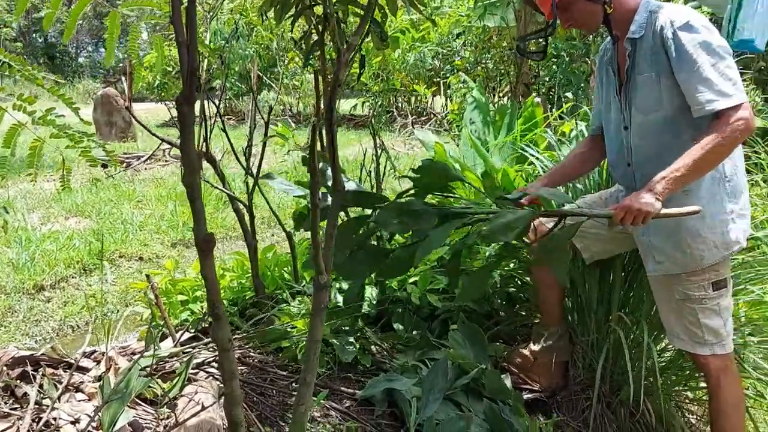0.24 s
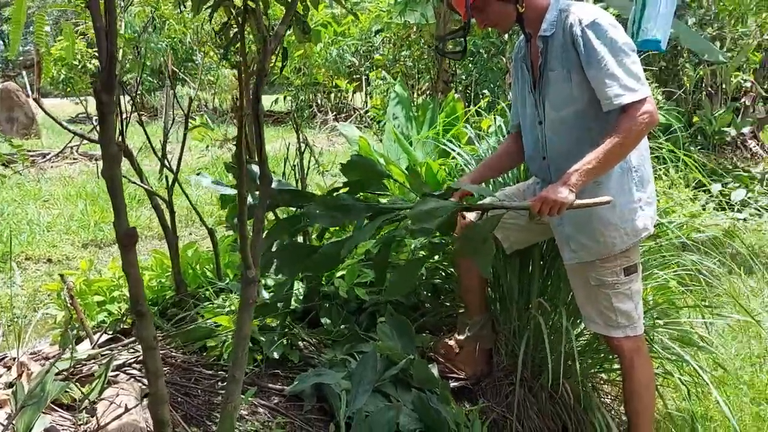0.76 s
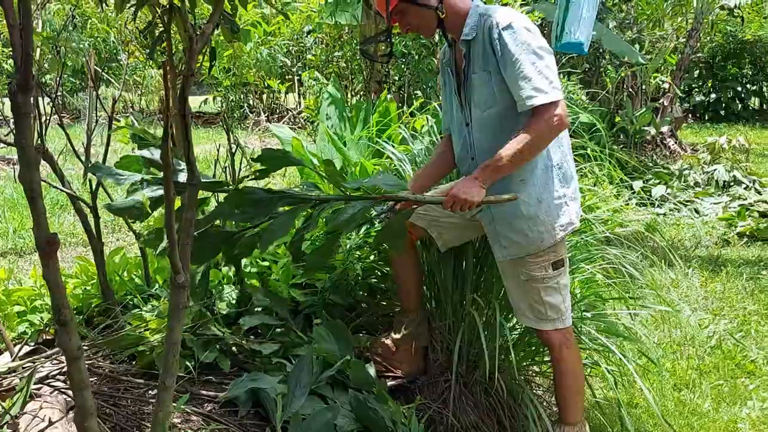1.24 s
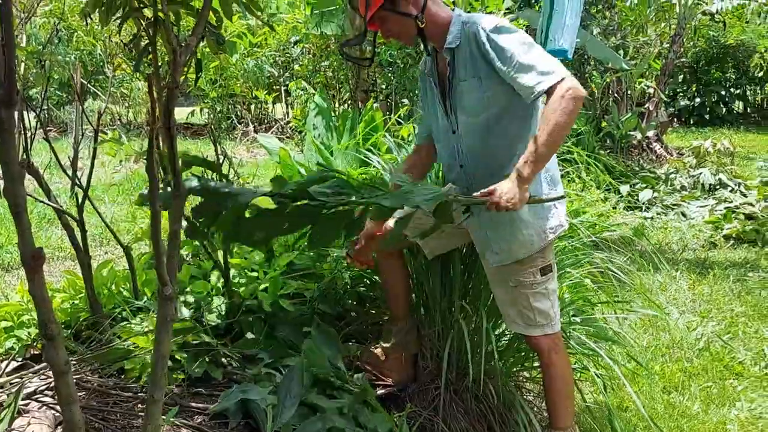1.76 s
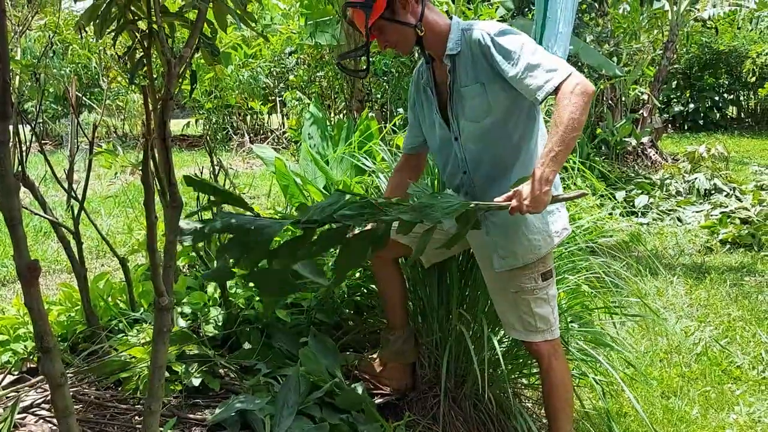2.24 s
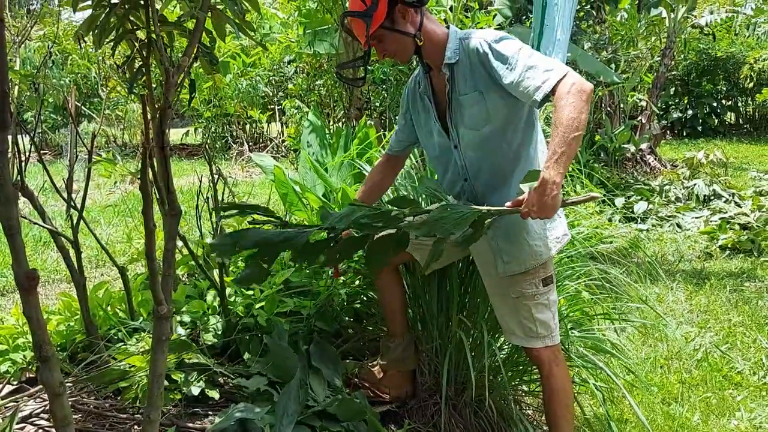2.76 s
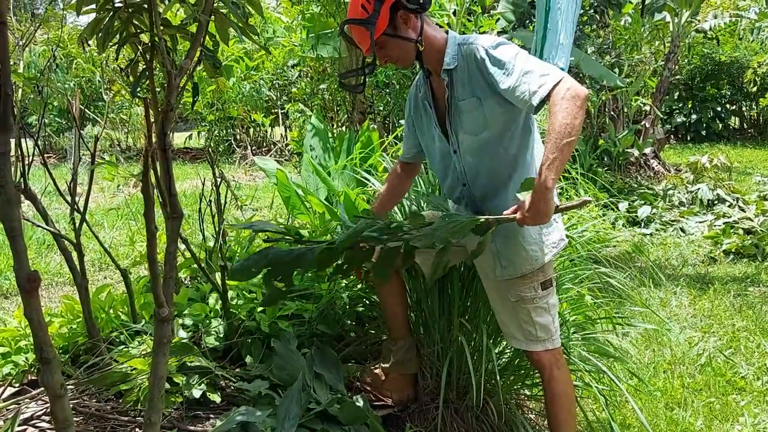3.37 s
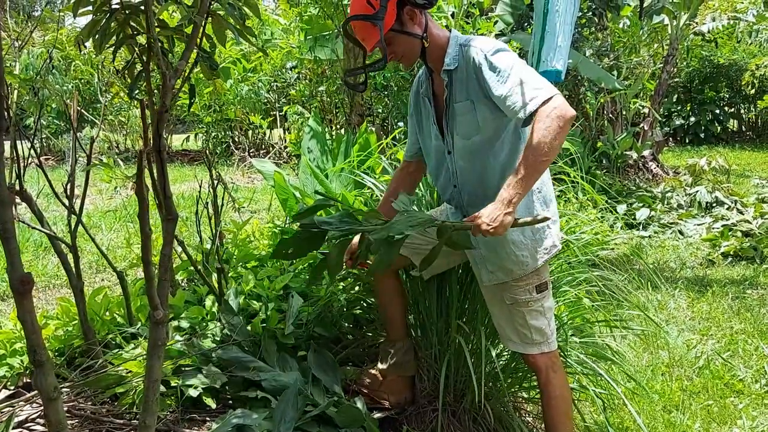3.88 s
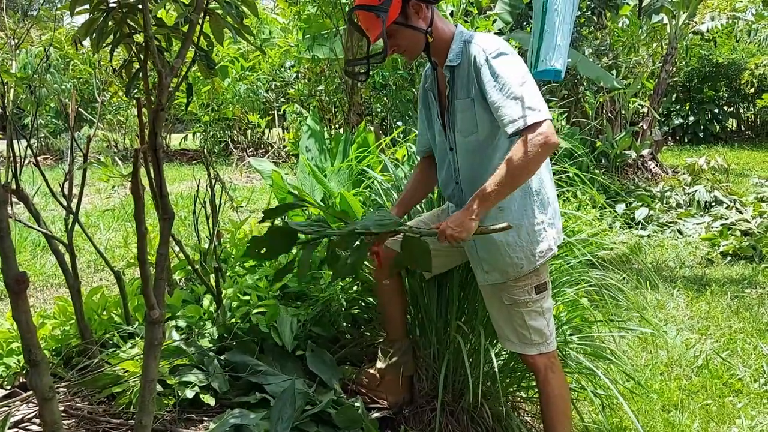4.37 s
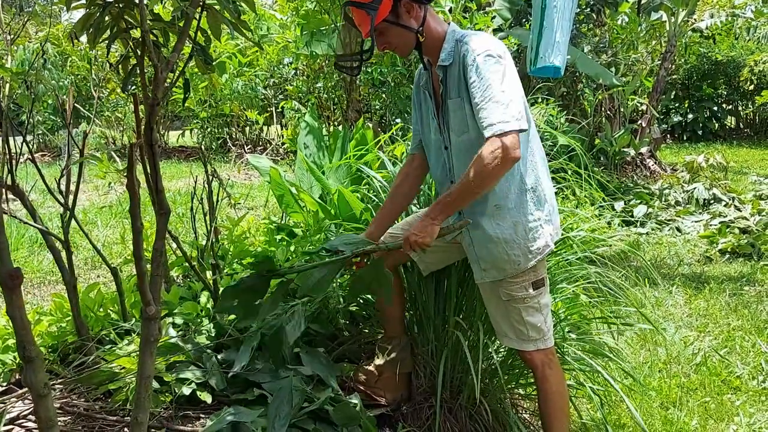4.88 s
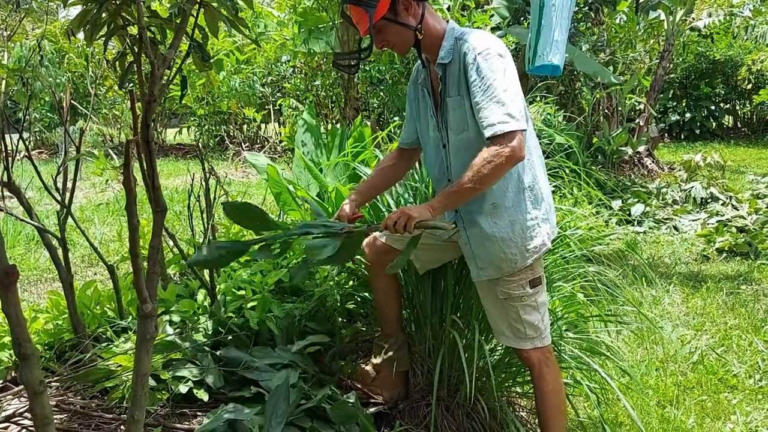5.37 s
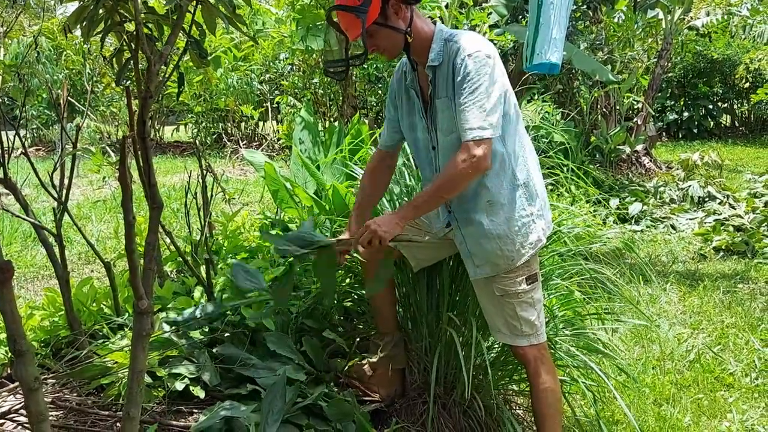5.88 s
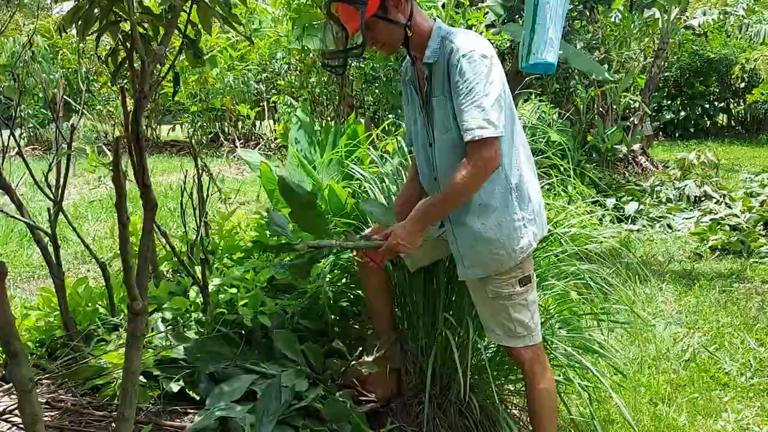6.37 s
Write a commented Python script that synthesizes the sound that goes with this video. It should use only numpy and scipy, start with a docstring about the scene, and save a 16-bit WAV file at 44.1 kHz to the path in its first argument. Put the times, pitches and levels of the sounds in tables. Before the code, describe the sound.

A continuous bright insect hiss, with a faintly pulsing buzz and thin whine, surrounds someone pruning a branch outdoors. Crunchy stem snips stand out, mild at first, then louder and crisper, with a double cut midway and a final bright snap followed by a hollow knock. Soft leaf crackles, ticks and faint thuds fill the gaps. Heard in stereo from a few metres, with little echo.

```python
"""In a garden, hand pruning shears snip side shoots off a leafy branch a few metres away.
Each cut is shaped noise: fibres crunch, the stem snaps and tears; sine waves ring for the steel blades.
Leaves rustle as crackling noise and tiny ticks; stems knock and thud as short, quickly fading noise.
All round, insects hiss as bands of noise, one with a thin whine in it, over a very faint stir of air."""
import sys
import numpy as np
from scipy import signal
from scipy.fft import rfft, irfft, next_fast_len
from scipy.io import wavfile
from scipy.ndimage import uniform_filter1d

SR = 44100
rng = np.random.default_rng(int(sys.argv[2]) if len(sys.argv) > 2 else 0)


def digitize_waveform(pressure):
    """Quantize a signal to 16-bit integers and store it at the path in sys.argv[1].

    Rows of a 2-D input are taken as channels; values are limited to [-1, 1].
    """
    field = np.atleast_2d(pressure).T
    bounded = np.clip(field, -1, 1)
    quanta = np.round(bounded * 32767).astype(np.int16)
    wavfile.write(sys.argv[1], SR, quanta)


N = 292383
T = np.arange(N) / SR  # time of every sample, s


def amp(db):
    """Turn decibels into a gain."""
    return 10 ** (np.asarray(db) / 20)


def unit(x):
    """Scale to an average strength (rms) of 1."""
    return x / np.sqrt(np.mean(x ** 2))


def pan(db):
    """Left and right gains whose levels differ by db; positive leans left."""
    return amp(np.array([[db], [-db]]) / 2)


def above(f, hz):
    """Smooth step from 0 below a frequency to 1 above it."""
    return 1 / (1 + (hz / f) ** 4)


def hump(f, hz, octaves):
    """Bell shape of a resonance, 1 at its centre."""
    return 1 / (1 + (np.log2(f / hz) / octaves) ** 2)


def colour(x, spectrum, extra_db=lambda f: 0):
    """Filter by a table of (frequency [Hz], level [dB]) plus an extra curve in dB; rms 1."""
    length = x.shape[-1]
    n = next_fast_len(length, True)
    f = np.fft.rfftfreq(n, 1 / SR) + 1
    hz, db = np.transpose(spectrum)
    curve_db = np.interp(np.log(f), np.log(hz), db) + extra_db(f)
    filtered = irfft(rfft(x, n) * amp(curve_db), n)
    return unit(filtered[..., :length])


def pair(length, alike_hz, grain_db=0):
    """Stereo noise, more alike in both ears below alike_hz; grain_db makes its strength uneven."""
    n = next_fast_len(length, True)
    size = 16  # samples in one grain
    grains = np.repeat(amp(grain_db * rng.exponential(size=n // size + 1)), size)[:n]
    noise = rng.standard_normal((2, n)) * np.minimum(grains, 6)
    mid, side = rfft(noise)
    likeness = 1 - above(np.fft.rfftfreq(n, 1 / SR) + 1, alike_hz)
    mid = mid * np.sqrt(1 + likeness)
    side = side * np.sqrt(1 - 0.85 * likeness)
    return irfft(np.array([mid + side, mid - side]), n)[:, :length]


def walk(rate):
    """Smoothly wandering random level, with about rate new values a second; rms 1."""
    hold = int(SR / rate)
    steps = np.repeat(rng.standard_normal(N // hold + 1), hold)
    smooth = uniform_filter1d(uniform_filter1d(steps, hold), hold)
    return unit(smooth[:N])


def swell(t, rise, decay):
    """Exponential growth up to time 0, then exponential decay (both in s)."""
    return np.exp(np.minimum(t / rise, -t / decay))


def event_time(size=16384):
    """Time axis in s, with 0 at the middle of a short event."""
    return (np.arange(size) - size // 2) / SR


def add(out, s, x):
    """Mix in a sound whose middle falls at time s."""
    start = int(s * SR) - x.shape[1] // 2
    first, last = max(start, 0), min(start + x.shape[1], N)
    out[:, first:last] += x[:, first - start:last - start]


# Tone of the faint stir of air: (frequency [Hz], level [dB])
AIR_TONE = [(20, -31.5), (45, -6.5), (75, 4.5), (130, 2), (300, -8), (700, -17), (1500, -29), (3000, -19),
            (15000, -21.5)]


def stir_of_air():
    """Air moves as very faint, mostly low noise whose level wanders a little."""
    return colour(pair(N, 1200), AIR_TONE) * amp(-79.5 + 0.91 * walk(5.6))


BUZZ_DB, HISS_DB, SHRILL_DB = -57.5, -52.1, -44.5  # middle levels of the three choirs
BUZZ_DRIFT_DB, HISS_DRIFT_DB, SHRILL_DRIFT_DB = 1.04, -0.14, 0.56  # each choir drifts by itself
DRIFT_PER_S = 3
HISS_FADE_DB_PER_S, SHRILL_RISE_DB_PER_S = 0.37, 0.17  # the hiss sinks as the shrill choir builds
PULSE_HZ, WHINE_HZ = 113, 2267  # beat of the sound organs, and the note of the nearest insect
# Tone of the narrow, pulsing choir: (frequency [Hz], level [dB])
BUZZ_TONE = [(1700, -45.5), (1920, -17.5), (2080, -3), (2250, 4), (2400, -4.5), (2540, -14.5),
             (2700, -65.5)]
# Tone of the broad, hissing choir: (frequency [Hz], level [dB])
HISS_TONE = [(2700, -54.5), (3050, -22), (3500, -6.5), (4000, 2), (5100, -2), (5800, 1.5), (6500, 1.5),
             (7400, -4), (9000, -10), (12000, -12), (13500, -8.5), (15700, -42.5)]
# Tone of the shrill choir in the left ear: (frequency [Hz], level [dB])
SHRILL_LEFT_TONE = [(7000, -39), (8000, -34.5), (8600, -6.5), (9200, 2.5), (9900, -1.5), (10700, -12),
                    (11600, -17.5), (13000, -32)]
# Tone of the shrill choir in the right ear: (frequency [Hz], level [dB])
SHRILL_RIGHT_TONE = [(7000, -37), (7900, -5.5), (8450, 0.5), (9050, 5), (9700, -10), (10500, -3.5),
                     (11400, -23), (13000, -31.5)]


def insects():
    """Many small sound organs blur into noise: a pulsing buzz with a whine, a hiss and a shrill band."""
    from_middle = T - T.mean()
    buzz_db = BUZZ_DB + BUZZ_DRIFT_DB * walk(DRIFT_PER_S)
    hiss_db = HISS_DB + HISS_DRIFT_DB * walk(DRIFT_PER_S) - HISS_FADE_DB_PER_S * from_middle
    shrill_db = SHRILL_DB + SHRILL_DRIFT_DB * walk(DRIFT_PER_S) + SHRILL_RISE_DB_PER_S * from_middle

    # beat and whine waver slightly in speed and pitch
    beat = np.cos(2 * np.pi * np.cumsum(PULSE_HZ + 0.12 * walk(3)) / SR)
    whine = np.sin(2 * np.pi * np.cumsum(WHINE_HZ + 3 * walk(25)) / SR)
    whine = whine * amp(-6 + 2 * walk(7))

    buzz = (colour(pair(N, 1560), BUZZ_TONE) + whine) * (1 + 0.18 * beat)
    buzz = buzz * amp(buzz_db + 0.44 * walk(15)) * pan(2.6)
    hiss = colour(pair(N, 1300), HISS_TONE) * amp(hiss_db + 0.28 * walk(10)) * pan(-2.2)
    left = colour(rng.standard_normal(N), SHRILL_LEFT_TONE) * amp(3.0 + 0.5 * walk(6.5))
    right = colour(rng.standard_normal(N), SHRILL_RIGHT_TONE) * amp(-1.0 + 0.5 * walk(8.2))
    shrill = np.array([left, right]) * (1 + 0.055 * beat) * amp(shrill_db)
    return buzz + hiss + shrill


# every cut shakes the leaves: delay, level relative to the cut, growth and dying away
SHAKE_LAG_S, SHAKE_DB, SHAKE_RISE_S, SHAKE_DECAY_S = 0.028, -33.5, 0.025, 0.06
LEAF_REST_DB = -85.5  # the leaves never lie quite still
# Pulls on the leafy branch: (time [s], strength of leaf motion [dB], rise [s], decay [s])
BRANCH_PULLS = [(.07, -63, 0.046, 0.06), (.21, -63.5, 0.062, 0.092), (1.265, -56, 0.045, 0.095),
                (1.73, -54.5, 0.051, 0.078), (1.99, -58, .03, 0.06), (2.44, -51.5, 0.039, 0.057),
                (2.59, -56.5, 0.074, 0.03), (3.46, -68.5, 0.11, 0.075), (3.93, -49.5, 0.098, 0.044),
                (4.3, -69, 0.063, 0.085), (4.85, -64, 0.11, 0.32), (5.23, -59, 0.031, 0.065),
                (5.33, -58, 0.037, 0.053), (6.02, -53, .04, 0.087), (6.41, -63.5, 0.053, 0.037)]
# Cuts of the shears, which also shake the leaves; crack, crunch and scatter are relative to the tearing:
# (time [s], tearing level [dB], tearing decay [s], first crack [dB], crunch [dB], foliage scatter [dB],
#  woody lows [dB], bright top [dB], blade ring strength [dB], stem resonance [Hz],
#  resonance strength [dB], left minus right [dB])
SHEAR_CUTS = [(0.8244, -29.5, 0.0052, -0.5, -9.5, -13.5, -3.5, -5.5, -23, 5900, 3.3, -0.5),
              (1.459, -21.5, 0.0042, 4.5, -9.5, -13.5, -11, -3.5, -4.5, 3400, 9.2, 0),
              (2.188, -24, 0.0033, -12, -14.5, -11, 1.5, 0.5, -16, 3500, 7, 0),
              (3.6759, -27.5, 0.0074, 3, -7.5, -8, -11, 3, -5, 4760, 13, -1),
              (3.6975, -19, 0.0056, 3, -11, -10, 10, 0, -6, 5370, 5.2, -1),
              (4.6205, -33, 0.012, -12, -32, -16, 5, -7, -24, 1980, 2.7, 2),
              (4.6322, -17, 0.0065, -6, -15, -15, 7, 6, -10.5, 6220, 7.1, 1),
              (5.4719, -33.5, 0.0066, -1, -17, -11.5, -7.5, 0.5, -7, 1500, 15.3, 0.5),
              (5.8413, -17.5, 0.0044, -3.5, -8.5, -12, 0.5, 5.5, -7, 5800, 6.5, 0)]


def leaf_motion():
    """Each pull on the branch swells and dies away; each cut shakes the leaves by its own strength."""
    power = amp(LEAF_REST_DB) ** 2
    for s, db, rise, decay in BRANCH_PULLS:
        power = power + (amp(db) * swell(T - s, rise, decay)) ** 2
    for s, db, *_ in SHEAR_CUTS:
        shake = swell(T - s - SHAKE_LAG_S, SHAKE_RISE_S, SHAKE_DECAY_S)
        power = power + (amp(db + SHAKE_DB) * shake) ** 2
    return np.sqrt(power)


TICKS_PER_S, TICK_DECAY_S, TICK_DB, TICK_HZ = 45, 0.0031, -5, 1560  # flicking leaf stalks
# Tone of leaves, for ticks and crackles: (frequency [Hz], level [dB])
LEAF_TONE = [(60, -11.5), (140, -5), (300, -6), (600, -3), (1000, -6), (1550, 1), (2700, -2), (5000, -3.5),
             (12000, -10.5), (15800, -18)]


def leaf_ticks():
    """Stalks catch and let go at random, each with a short dry tick of its own size; rms 1."""
    sizes = amp(4.6 * np.clip(rng.standard_normal(N), -2, 2))
    flicks = (rng.random(N) < TICKS_PER_S / SR) * sizes
    fading = signal.lfilter([1], [1, -np.exp(-1 / (TICK_DECAY_S * SR))], flicks)
    return colour(pair(N, 2500) * fading, LEAF_TONE, lambda f: 7 * hump(f, TICK_HZ, 0.44))


# Leaves brushing lightly past each other: (time [s], level [dB], swell time [s])
LEAF_BRUSHES = [(.2, -53, 0.099), (1.1, -53, .15), (1.78, -51, 0.16), (2.43, -50, .05), (2.68, -50, 0.11),
                (3.5, -49, .06), (4.3, -54.5, .07), (5.1, -53, .09)]
# Light, bright tone of brushing leaf faces: (frequency [Hz], level [dB])
BRUSH_TONE = [(2500, -26), (4500, 0.5), (7500, 4.5), (11500, 5.5), (13500, -8.5), (15800, -9)]


def rustle():
    """Leaves slide over each other in fits of tiny crackles, with a light sheen where faces brush."""
    # different leaves take turns, so low, middle and upper crackles flicker separately
    crackle = 0
    for hz in (300, 800, 1600):
        leaf = colour(pair(N, 2150, grain_db=2.0), LEAF_TONE, lambda f: 10 * hump(f, hz, 0.49))
        crackle = crackle + leaf * amp(-8.5 + 4.0 * walk(80))
    moving = (crackle + amp(TICK_DB) * leaf_ticks()) * leaf_motion()
    brushing = sum(amp(db) * swell(T - s, width, width) for s, db, width in LEAF_BRUSHES)
    return moving + colour(pair(N, 1500), BRUSH_TONE) * brushing


# Stems and leaves knocking, levels before a shared 2 dB lift:
# (time [s], level [dB], rise [s], decay [s], treble [dB], hollow resonance [Hz])
STEM_KNOCKS = [(0.175, -60.5, .006, 0.019, 6, 333), (0.275, -58.5, 0.0037, 0.007, 8, 1440),
               (0.781, -60, 0.0038, 0.0048, 5, 1240), (1.191, -58, 0.0075, 0.0028, 7, 647),
               (1.262, -58, 0.0035, 0.0096, -9, 1660), (1.703, -54, .004, 0.013, 13, 1450),
               (1.738, -58.5, 0.0073, 0.016, -3, 325), (1.941, -54.5, 0.006, 0.025, 14.5, 1700),
               (2.004, -50, 0.0049, 0.0087, 7, 785), (2.405, -58, .004, .008, 14, 1400),
               (2.443, -57.5, 0.021, 0.03, 1, 1180), (3.495, -63.5, 0.0017, 0.017, 15, 1560),
               (3.891, -48.5, 0.022, 0.03, -5, 1130), (4.685, -51, 0.003, 0.0047, 0, 830),
               (4.716, -54, 0.0045, 0.0061, -11, 296), (5.201, -57.5, .003, 0.043, 18, 1510),
               (5.394, -60, .002, 0.0069, 3, 1500), (5.968, -56.5, 0.0086, 0.029, -7, 784),
               (5.993, -44.5, 0.008, 0.0088, -3, 1510), (6.0031, -33.5, 0.0006, 0.012, 4.5, 543),
               (6.012, -44, 0.0034, 0.009, 4, 231)]
# Shared tone of the knocks: (frequency [Hz], level [dB])
KNOCK_TONE = [(60, -37), (130, -4), (220, 0), (550, -2), (800, 0.5), (1100, 3.5), (1650, 3), (2600, -19),
              (5000, -17), (10000, -19), (15800, -20.5)]


def knocks():
    """Stems and leaves knock softly: quickly damped noise, each blow with its own hollow note."""
    out, t = np.zeros((2, N)), event_time()
    for s, db, rise, decay, treble_db, hollow_hz in STEM_KNOCKS:
        tone = lambda f: treble_db * above(f, 2000) + 8 * hump(f, hollow_hz, 0.14)
        noise = colour(pair(len(t), 2500, grain_db=1.5), KNOCK_TONE, tone)
        add(out, s, amp(db + 2.0) * noise * swell(t, rise, decay))
    return out


def stem_ripple(spacing_hz, depth_db):
    """Every stem has its own irregular peaks and dips; returns dB as a function of frequency."""
    hz = np.arange(0, SR / 2, spacing_hz)
    db = depth_db * rng.standard_normal(len(hz))
    return lambda f: np.interp(f, hz, db)


# Ringing notes of the steel shears, varied a little on every cut:
# (frequency [Hz], level [dB], time to fall by 60 dB [s])
BLADE_NOTES = [(1738, 4, 0.045), (2000, -8, 0.068), (3306, -18.5, 0.15), (3677, 5.5, 0.1), (4570, -32, .08),
               (5270, -14, 0.072), (5560, -30, 0.065), (5900, 8.5, 0.047), (6400, -3, 0.059),
               (8980, -9, 0.036), (11700, -7, .04), (13700, -6, 0.043), (15900, -16, 0.024)]


def blade_ring(t):
    """Steel rings as fading sine waves; their pitches and levels shift a little on every cut."""
    hz, db, t60 = np.transpose(BLADE_NOTES)[:, :, None]
    hz = hz * (1 + 0.0052 * rng.standard_normal(hz.shape))
    size = amp(db + 0.9 * rng.standard_normal((2, len(hz), 1)))  # separate for each ear
    phase = rng.uniform(0, 2 * np.pi, size.shape)
    fading = np.exp(-np.log(1000) * abs(t) / t60)
    notes = size * np.sin(2 * np.pi * hz * t + phase) * fading
    return notes.sum(axis=1) * (t > 0)


# Tone of a stem breaking between the blades: (frequency [Hz], level [dB])
SNAP_TONE = [(100, -29), (250, -18), (450, -20.5), (850, -6.5), (1200, -10.5), (1900, -1), (2300, 2),
             (2750, -10.5), (3500, -1), (4500, -1), (5500, 2.5), (6300, 5.5), (7000, -7.5), (8300, 2.5),
             (10200, -3.5), (12500, 2), (15800, -4)]


def cuts():
    """Fibres crunch ever harder, the stem cracks and tears, and nearby foliage scatters the snap."""
    out, t = np.zeros((2, N)), event_time()
    for (s, db, decay, crack_db, crunch_db, scatter_db, wood_db, top_db,
         ring_db, stem_hz, stem_db, pan_db) in SHEAR_CUTS:
        ripple = stem_ripple(200, 2.2)
        # the stem's main resonance stands between two troughs
        note = lambda f: stem_db * (1.58 * hump(f, stem_hz, 0.13) - 0.54 * hump(f, stem_hz, 0.35))
        balance = lambda f: wood_db * (1 - above(f, 1470)) + top_db * above(f, 9600)
        tone = lambda f: balance(f) + note(f) + ripple(f)

        # the crunch is duller, with half the stem's note
        crunch_tone = lambda f: tone(f) - 0.5 * note(f) - 6 * above(f, 3300)
        fibres = colour(pair(len(t), 2800, grain_db=0.5), SNAP_TONE, crunch_tone)
        crunch = fibres * amp(crunch_db) * swell(t, 0.014, 0.0012)

        # the first crack is almost instant; the last fibres tear over a few milliseconds
        crack = amp(crack_db) * swell(t - 0.0003, 0.00012, 0.0011)
        tearing = swell(t - 0.0012, 0.0004, decay)
        snap = colour(pair(len(t), 2800, grain_db=0.5), SNAP_TONE, tone) * (crack + tearing)

        # an early scatter, then a weaker and longer one
        spread = swell(t - 0.004, 0.00039, 0.012) + amp(-9.5) * swell(t - 0.01, 0.0024, 0.045)
        scatter = colour(pair(len(t), 2140, grain_db=-0.4), SNAP_TONE, tone) * spread * amp(scatter_db)

        ring = amp(ring_db - 14.0) * blade_ring(t)
        add(out, s, amp(db) * pan(pan_db) * (crunch + snap + scatter + ring))
    return out


# Dull thuds as the branch is pulled about: (time [s], level [dB], rise [s], decay [s])
BRANCH_THUDS = [(2.32, -71, 0.024, 0.018), (3.574, -65, 0.011, 0.019), (3.662, -51.5, 0.011, 0.016),
                (3.705, -57, .01, 0.023), (5.65, -68.5, 0.016, 0.013), (6.016, -74, .01, 0.052)]
# Low tone of the thuds: (frequency [Hz], level [dB])
THUD_TONE = [(20, -23), (40, -13), (65, 2), (95, -3.5), (140, -7.5), (400, -54)]


def thuds():
    """The pulled branch thuds faintly: short swells of low noise, heavier on the right."""
    out, t = np.zeros((2, N)), event_time()
    for s, db, rise, decay in BRANCH_THUDS:
        noise = colour(pair(len(t), 75), THUD_TONE)
        add(out, s, amp(db) * pan(-10.5) * noise * swell(t, rise, decay))
    return out


GROUND_LAG_S = 0.00345  # how much later the bounce arrives
GROUND_SHARE, GROUND_HZ = 0.12, 2640  # strength of the bounce, and where the grass starts to absorb


def ground(x):
    """A late, duller copy bounces off the soil; the left ear lags, as the work lies slightly right."""
    dull = signal.sosfilt(signal.butter(1, GROUND_HZ, fs=SR, output="sos"), x)
    left, right = x + GROUND_SHARE * np.roll(dull, int(GROUND_LAG_S * SR), axis=1)
    return np.array([np.roll(left, 2), right])  # lag in samples


def scene():
    """Shears and foliage over the insects and a very faint stir of air."""
    background = stir_of_air() + insects()
    work = ground(rustle() + knocks() + cuts())
    return background + work + thuds()


TOP_HZ = 15850  # upper limit of the sound


def record(dry):
    """The recorder steeply cuts everything above its upper limit."""
    return signal.sosfilt(signal.ellip(10, 0.1, 70, TOP_HZ, fs=SR, output="sos"), dry, axis=-1)


dry = scene()
out = record(dry)
digitize_waveform(out)
```